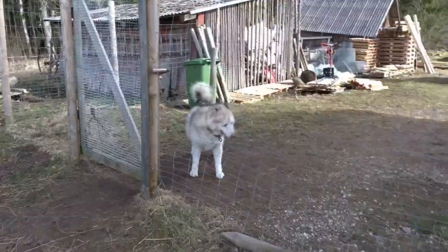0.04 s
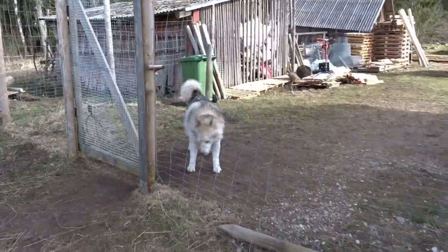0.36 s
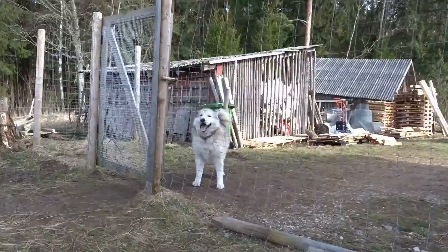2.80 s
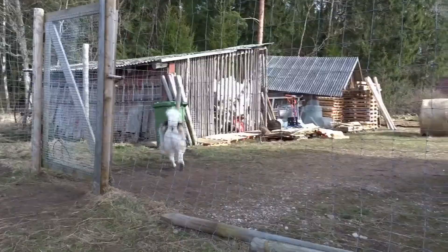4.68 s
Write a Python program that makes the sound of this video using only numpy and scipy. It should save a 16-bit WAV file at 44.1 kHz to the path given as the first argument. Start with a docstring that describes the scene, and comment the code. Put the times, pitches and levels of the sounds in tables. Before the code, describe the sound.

A large dog calls close to the microphone in an outdoor yard with a faint echo. From about 0.2 to 1.2 seconds it gives a soft, thin whine that climbs in pitch, with a faint high whistle on top. At 1.5 seconds comes one howl, the loudest sound, which rises, holds and slowly sinks, breaking into a hoarse rasp near 2.9 seconds. Three more high whines follow, at about 2.9 to 3.5, 3.8 to 4.5 and 4.7 to 5.4 seconds; the second rises and the last wavers. Each drops away into a small breathy puff, and the voice cracks briefly near 3.6 and 3.9 seconds. Far off, another dog whimpers faintly in the first second. Small distant birds pipe now and then, clearest around 3.5 seconds, with quick chirps after 5 seconds. Underneath are quiet open air, a slight early rustle and light wind rumbling on the microphone.

```python
"""A thin whine comes first, from a large dog close to the microphone in a kennel yard; then one loud
howl and three more whines. Each call rises, holds and drops away, its vocal folds sounding through
throat, mouth or nose. A high whistle rides on the whines, and the voice breaks hoarse three times.
Far off are small birds, another dog and a blurred echo of the first whine. The sheds ring faintly,
and a little wind rumbles at the two closely spaced microphone ports."""
import sys
import numpy as np
from scipy import signal
from scipy.fft import rfft, irfft
from scipy.io import wavfile
from scipy.ndimage import uniform_filter1d

SR = 44100
rng = np.random.default_rng(int(sys.argv[2]) if len(sys.argv) > 2 else 0)


def to_wav(sig):
    """Store sig (one row per channel, or 1-D mono) as 16-bit WAV at the path in sys.argv[1].

    Samples outside -1..1 are clipped; the rate is SR.
    """
    pcm = np.clip(np.atleast_2d(sig), -1, 1) * 32767
    pcm = np.round(pcm).astype(np.int16)
    wavfile.write(sys.argv[1], SR, pcm.T)  # frames by channels


N = 244241
T = np.arange(N) / SR

# The near dog's whines, up to where it lets go.
# Each row: time in seconds, pitch in Hz, level ahead of the nose in dB, rasp in dB.
FIRST_WHINE = [(0.207, 599, -46.5, -51), (0.265, 644, -50, -49.5), (0.33, 736, -41.5, -52),
               (0.6, 822.6, -42, -44), (0.76, 802.6, -38, -49.5), (0.84, 826, -43, -38),
               (0.885, 906, -40.5, -37.5), (1.0, 938, -39.5, -42), (1.085, 906.6, -36, -40),
               (1.168, 773, -37, -39)]
HIGH_WHINE = [(2.93, 1074, -35, -38.5), (3.12, 1085, -39.5, -33.5), (3.18, 1152, -26, -38),
              (3.274, 1209, -25.5, -47), (3.44, 1167, -26.5, -41), (3.468, 1086, -43.5, -43.5),
              (3.49, 1066, -31, -44)]
RISING_WHINE = [(3.795, 645, -38.5, -56), (3.85, 611.7, -27, -60), (3.89, 686, -33, -35),
                (3.96, 826, -35, -37), (4.014, 994, -36, -38.5), (4.05, 943.5, -32, -48),
                (4.1, 1053, -30.5, -57), (4.29, 1073, -28, -44), (4.422, 1052, -27, -40.5)]
WAVERING_WHINE = [(4.728, 815, -39.5, -36.5), (4.82, 848, -37.5, -42.5), (4.855, 930, -36, -39),
                  (4.95, 910, -31.5, -44.5), (5.035, 1018, -29.5, -41.5), (5.114, 924, -28, -45),
                  (5.17, 879, -35.5, -44), (5.224, 917, -27, -46), (5.252, 874, -32, -46),
                  (5.35, 813, -27, -42)]
# Each row: curve, final drop in seconds, level after it in dB, then octave, overtones and hiss in dB
# against the level, jitter as a share of pitch, flutter in dB, fall per overtone in dB, lean left in dB.
WHINES = [(FIRST_WHINE, .036, -32, 5, -38, -23.5, 0.0054, .4, 2.6, 3.4),
          (HIGH_WHINE, 0.042, -42, 0, -29, -55, .0027, 0.7, 3.8, 2.5),
          (RISING_WHINE, .042, -38, -3.04, -25, -32.5, 0.0017, 0.29, 1.8, 2.9),
          (WAVERING_WHINE, 0.033, -26, -1.1, -35, -30, 0.0061, 1.67, 3.2, 3.5)]
# The howl. Each row: time in seconds, pitch in Hz, then fundamental, octave and higher overtones in dB.
HOWL = [(1.555, 393.3, -43, -27.5, -36), (1.595, 506, -29.5, -21.5, -35), (1.635, 549.7, -16.5, -17, -22.5),
        (1.67, 596.3, -10, -21, -35), (1.71, 646, -8.5, -51.5, -62.5), (1.745, 651, -7.5, -33.5, -50.5),
        (1.8, 717, -10, -22.5, -44.5), (1.88, 757.2, -9.5, -28, -40.5), (1.99, 748.5, -9.5, -21.5, -35.5),
        (2.12, 685.3, -10, -20.5, -41.5), (2.26, 673.6, -16.5, -12.5, -39), (2.521, 649.4, -13.5, -23, -30),
        (2.641, 633.5, -7.5, -39.5, -36), (2.781, 633.7, -10.5, -32, -37),
        (2.86, 589.3, -25.5, -16.5, -29.5), (2.889, 541, -37, -15.5, -31)]
# The nose, deeply notched near 1 kHz, and the throat. Each row: frequency in Hz, gain in dB.
NOSE = [(520, -3), (630, 7), (740, -2.5), (850, 0), (920, 2.5), (965, -1.5), (1015, -15.5), (1062, -0.5),
        (1200, -0.5), (1400, -2.5), (1620, -6.5), (1850, -2.5), (2000, 1), (2140, -7), (2300, -23)]
THROAT = [(1100, 13.5), (1650, 17), (2200, -9.5), (2700, -1.5), (3200, -6), (3900, -2), (4600, -8.5),
          (5400, -27), (6600, -2), (7400, -23), (8900, -6.5), (10500, -18), (11400, -33), (12500, -54)]
# Jaw and lips move in the howl. Each row: time in seconds, lower and upper mouth resonance in Hz.
HOWL_MOUTH = [(1.65, 1677, 2840), (1.76, 1950, 4100), (1.9, 2300, 3670), (2.02, 2822, 4470),
              (2.11, 1920, 4046), (2.25, 1907, 3510), (2.41, 2603, 3260), (2.63, 2600, 3700),
              (2.75, 2020, 3780), (2.84, 2890, 4330)]
# The lower, then the upper resonance. Each row: width in Hz, strength in dB.
MOUTH_SHAPES = [(260, 15.5), (380, 5.5)]
# One whistle a whine. Each row: start and end in seconds, first and last pitch in Hz, level in dB.
WHISTLES = [(.35, 1.22, 3840, 3647, -59), (3.105, 3.539, 3810, 3587, -55), (3.959, 4.481, 3718, 3604, -52),
            (4.719, 5.379, 3670, 3533, -55.5)]
# The whistle's tones. Each row: multiple of the whistle's pitch, multiple of the folds' pitch.
SIDEBAND_ORDERS = [(1, -2), (1, -1), (1, 0), (1, 1), (2, -1), (2, 0), (2, 1), (2, 2), (2, 3), (3, 0),
                   (3, 1)]
# The gain of each of those tones in dB.
SIDEBAND_DB = [1.5, -12, -5, -6.5, -22, -10, -10, -11.5, -30, -14.5, -26]
# Hoarse breaks. Each row: start, peak and end in seconds, level in dB.
BREAKS = [(2.878, 2.985, 3.17, -25.5), (3.531, 3.59, 3.63, -38), (3.851, 3.891, 3.96, -37)]
# Noise of the throat, the teeth and rattling folds. Each row: frequency in Hz, spectral density in dB.
RASP = [(100, -40), (280, -5), (550, -4.5), (850, -1), (1400, -3), (1900, -1.5), (2400, -16.5), (3200, -25),
        (4600, -22.5), (6500, -49.5), (13000, -65.5)]
HISS = [(1500, -25), (2800, 3.5), (3900, -12), (4700, 4), (5600, -12), (7400, -4.5), (8600, -7), (11200, 3),
        (12100, -1.5), (13200, -21.5)]
HOARSE = [(250, -34), (550, -18.5), (800, 8), (1150, 3.5), (1500, -9.5), (1950, 1.5), (2350, -11.5),
          (2900, 2), (3600, -18), (4700, -12.5), (6500, -23), (8000, -20.5), (10500, -23.5), (12400, -49),
          (13800, -72)]
# Far tones: another dog's whimpers, and at 1.14 s the blurred echo of the near dog's first whine.
# Each row: start and length in seconds, first and last pitch in Hz, level in dB,
# octave against the fundamental in dB, buzz as a share of pitch.
FAR_TONES = [(0.0, 0.087, 766, 734, -50, -18, 0.034), (0.394, 0.53, 1390, 1254, -45, -33, 0.037),
             (.6, .2, 1060, 929, -40, -8, .016), (1.14, .36, 869, 813, -44.5, -9, 0.056),
             (3.587, .03, 1040, 863, -38, -20.5, .05)]
# Single notes from the trees. Each row: start and length in seconds, first and last pitch in Hz,
# level in dB, buzz as a share of pitch.
BIRDS = [(-.04, 0.49, 5740, 4380, -63, .004), (.558, .17, 4213, 4090, -57, 0.0086),
         (.623, 0.28, 5150, 4600, -60, .006), (1.3, .25, 4580, 4450, -65, 0.0039),
         (3.28, 0.155, 6840, 6620, -49.5, .026), (3.495, 0.0615, 3750, 3930, -35.5, 0.0056),
         (3.535, 0.062, 3945, 3840, -42, .006), (3.497, .24, 3094, 2900, -54, 0.012),
         (4.5, .12, 3350, 3500, -53.5, 0.037)]
# One bird pipes on a steady pitch. Each row: start in seconds, level in dB.
PIPES = [(0.024, -39), (3.098, -45), (3.665, -48)]
# The yard's echo. Each row: frequency in Hz, time to fall 60 dB in seconds.
YARD_DECAY = [(200, 0.92), (1000, 0.71), (4000, 0.31), (12000, 0.41)]
# Its colour. Each row: frequency in Hz, gain in dB.
ECHO_COLOUR = [(200, 4), (650, -9), (1100, -5), (2500, 1), (6000, 8), (12000, 2)]
# Open air, rustling and wind. Each row: frequency in Hz, spectral density in dB.
AIR = [(15, -48), (25, -25.5), (233, -2.5), (469, -8.5), (631, 1.5), (848, -13.5), (945, -4.5),
       (1620, -5.5), (2850, -16), (3630, -15.5), (5730, -23.5), (10900, -26), (12200, -25.5), (13500, -65),
       (15500, -65)]
RUSTLE = [(120, -24.5), (250, -7), (600, -7), (1100, -10), (2000, -10.5), (3400, -4.5), (4700, -18.5),
          (7000, -33)]
RUMBLE = [(12, -34.5), (28, -6), (48, 2.5), (75, -3.5), (130, -16.5), (400, -46.5)]
# The rustling dies down. Each row: time in seconds, level in dB.
RUSTLE_LEVEL = [(0, -44.5), (.2, -51.5), (.3, -46), (.45, -53.5), (.8, -58.5), (1.4, -60.5), (5.54, -69)]
# Gusts on the microphone. Each row: peak time and width in seconds, level in dB.
GUSTS = [(1.7, .07, -56.5), (2.42, 0.19, -58.5), (3.3, 0.13, -69), (3.66, 0.054, -51.5), (4.06, 0.17, -55),
         (4.72, 0.046, -62.5)]
# The two microphone ports. Each row: frequency in Hz, phase between them in radians.
PORT_PHASE = [(0, 0), (2150, 0.23), (15400, 0.13)]

# above its middle pitch a whine gets purer and hisses more
MIDDLE_HZ, OVERTONE_DB_PER_OCTAVE, HISS_DB_PER_OCTAVE = 904, -18, 13.5
WHINE_MOUTH_HZ = (2260, 3200)
# every whine ends alike: the pitch collapses, the tone dies, and a puff of rasp follows
COLLAPSE_HZ, LOWEST_HZ, COLLAPSE_POWER = 587, 476, 1.4
TONE_RELEASE_S, TONE_RELEASE_DB = .016, -15.5
PUFF_DB, PUFF_S, PUFF_FADE_DB = -34.5, .085, -12
HOWL_ATTACK_S, HOWL_RELEASE_S, HOWL_EDGE_DB, BRIGHT_DB = .04, .014, -24.5, -37
# below this pitch the howling folds go slack: more rasp, less hiss
TAUT_HZ, SLACK_RASP_DB_PER_OCTAVE, SLACK_HISS_DB_PER_OCTAVE = 680, 14, -17
WHISTLE_RISE_SHARE, WHISTLE_RELEASE_S, WHISTLE_EDGE_DB = .4, .057, -11.5
PIPE_HZ, PIPE_S, PIPE_ECHO_DB, PIPE_ECHO_S = 3953, .11, -12.5, .22
CHIRP_START_S, CHIRP_PERIOD_S, CHIRP_COUNT = 5.102, .0873, 5
CHIRP_S, CHIRP_FROM_HZ, CHIRP_TO_HZ, CHIRP_DB = .0277, 3640, 3140, -51.5
AIR_DB, BREEZE_DB = -54, -80


def near_dog():
    """The dog at the microphone, near centre: howl, whines with their whistles, and hoarse breaks."""
    out = np.zeros((2, N))
    add(out, *howl(), pan_db=-.3)
    for (curve, *manner, pan_db), row in zip(WHINES, WHISTLES):
        add(out, *whine(curve, *manner), pan_db)
        add(out, *whistle(curve, *row), pan_db=4.5)
    for row in BREAKS:
        add(out, *hoarse_break(*row), pan_db=-.7)
    return out


def howl():
    """The full voice through a moving mouth, raspy where it is low and hissing where it is bright."""
    start, end = HOWL[0][0], HOWL[-1][0]
    t = np.arange(start - HOWL_ATTACK_S, end + HOWL_RELEASE_S, 1 / SR)
    hz, first_db, octave_db, overtone_db = follow(HOWL, t)
    edge_db = np.interp(t, [t[0], start, end, t[-1]], [HOWL_EDGE_DB, 0, 0, HOWL_EDGE_DB])
    slack = np.maximum(np.log2(TAUT_HZ / hz), 0)
    brightness_db = overtone_db - BRIGHT_DB
    rasp_db = -40 + .33 * brightness_db + edge_db / 2 + SLACK_RASP_DB_PER_OCTAVE * slack
    hiss_db = -54 + .7 * brightness_db + edge_db / 2 + SLACK_HISS_DB_PER_OCTAVE * slack
    return voice(t, hz, first_db + edge_db, octave_db + edge_db, overtone_db + edge_db, rasp_db, hiss_db,
                 follow(HOWL_MOUTH, t), jitter=.0018, flutter_db=.12, fall_db=.19, hiss_shift=.88)


def whine(curve, drop_s, end_db, octave_db, overtone_db, hiss_db, jitter, flutter_db, fall_db):
    """A thin tone slides across the resonances of the nose, then collapses into a puff."""
    let_go, last_hz = curve[-1][:2]
    end = let_go + drop_s
    puff = [(end, last_hz, end_db, PUFF_DB), (end + PUFF_S, last_hz, end_db, PUFF_DB + PUFF_FADE_DB)]
    t, hz, db, rasp_db = curves(list(curve) + puff)
    fallen = (np.maximum(t - let_go, 0) / drop_s) ** COLLAPSE_POWER
    hz = np.maximum(hz - (last_hz - COLLAPSE_HZ) * fallen, LOWEST_HZ)
    db = db + TONE_RELEASE_DB * np.maximum(t - end, 0) / TONE_RELEASE_S
    height = np.log2(hz / MIDDLE_HZ)
    first_db = db + read(NOSE, hz)
    octave_db = db + octave_db + read(NOSE, 2 * hz)
    overtone_db = db + overtone_db + OVERTONE_DB_PER_OCTAVE * height
    hiss_db = db + hiss_db + HISS_DB_PER_OCTAVE * height
    return voice(t, hz, first_db, octave_db, overtone_db, rasp_db, hiss_db,
                 WHINE_MOUTH_HZ, jitter, flutter_db, fall_db)


def voice(t, hz, first_db, octave_db, overtone_db, rasp_db, hiss_db,
          centres, jitter, flutter_db, fall_db, hiss_shift=1):
    """Nearly pure fold vibration with throat overtones, plus turbulence that puffs once a cycle."""
    size = len(t)
    # the closer the rasp comes to the tone, the less steadily the folds vibrate
    unrest = np.minimum(amp(rasp_db - np.maximum(first_db, octave_db)), 1)
    phase = phase_of(hz * (1 + (jitter + .013 * unrest) * wander(130, size)))
    tone = amp(first_db) * np.sin(phase) + amp(octave_db) * np.sin(2 * phase)
    # as the pitch collapses, strong and weak cycles alternate: a creak an octave down
    collapse = np.clip(-np.gradient(np.log(hz)) * SR / 7, 0, 1) ** 2
    tone += uniform_filter1d(collapse, size=900) * amp(first_db - 16) * np.sin(phase / 2)
    orders = np.arange(3, 21)[:, None]
    tract = vocal_tract(centres, orders * hz) * amp(-fall_db * orders)
    tract /= np.linalg.norm(tract, axis=0)
    shimmer = amp(3.5 * np.array([wander(12, size) for _ in orders]))
    tone += amp(overtone_db - 2.5) * (tract * shimmer * np.sin(orders * phase)).sum(0)
    tone *= np.sqrt(2) * amp((flutter_db + 2.7 * unrest) * wander(25, size))
    puffs = unit(1 + .28 * np.cos(phase))
    rasp = amp(rasp_db - 4) * patchy(noise(RASP, size), depth_db=5)
    hiss = amp(hiss_db - 1) * patchy(noise(np.array(HISS) * [hiss_shift, 1], size), depth_db=4.5)
    return t[0], tone * fade(size, seconds=.0049) + puffs * (rasp + hiss) * fade(size, seconds=.019)


def vocal_tract(centres, hz):
    """Gain of the throat at frequencies hz, lifted by the two mouth resonances at centres."""
    peaks = sum(amp(db) / (1 + (2 * (hz - centre) / width_hz) ** 2)
                for centre, (width_hz, db) in zip(centres, MOUTH_SHAPES))
    return amp(read(THROAT, hz)) * (1 + peaks)


def whistle(curve, start, end, first_hz, last_hz, db):
    """A high whistle swells and sags; the folds chop it into sum and difference tones."""
    peak = start + WHISTLE_RISE_SHARE * (end - start)
    t, swell_db = curves([(start, WHISTLE_EDGE_DB), (peak, 0),
                          (end - WHISTLE_RELEASE_S, 0), (end, WHISTLE_EDGE_DB)])
    size = len(t)
    carrier = phase_of(np.linspace(first_hz, last_hz, size) * (1 + .003 * wander(140, size)))
    folds = phase_of(follow(curve, t)[0])
    tones = sum(amp(tone_db + 2 * wander(23, size)) * np.sin(m * carrier + k * folds)
                for (m, k), tone_db in zip(SIDEBAND_ORDERS, SIDEBAND_DB))
    return start, np.sqrt(2) * amp(db + swell_db) * tones * fade(size)


def hoarse_break(start, peak, end, db):
    """The folds lose their pitch and rattle irregularly, with a hiss at the teeth."""
    t, level_db = curves([(start, db - 12.5), (peak, db), (end, db - 21)])
    rattle = patchy(noise(HOARSE, len(t)), depth_db=2.5)
    hiss = amp(-32) * noise(HISS, len(t))
    return start, amp(level_db + 1.63 * wander(81, len(t))) * (rattle + hiss) * fade(len(t))


def far_sounds():
    """Far off and a little left: birds, another dog's whimpers and the first whine's blurred echo."""
    out = np.zeros((2, N))
    for start, length, first_hz, last_hz, db, buzz in bird_notes():
        phase, swell = glide(length, first_hz, last_hz, buzz)
        add(out, start, amp(db) * swell * np.sin(phase), pan_db=3)
    for start, length, first_hz, last_hz, db, octave_db, buzz in FAR_TONES:
        phase, swell = glide(length, first_hz, last_hz, buzz)
        tone = np.sin(phase) + amp(octave_db) * np.sin(2 * phase)
        add(out, start, amp(db) * swell * tone, pan_db=1.5)
    return out


def bird_notes():
    """Rows for the single notes, the piping with its answer from the wood, and the falling chirps."""
    pipes = [(s, PIPE_S, PIPE_HZ, PIPE_HZ, db, .002) for s, db in PIPES]
    echoes = [(s + PIPE_S / 2, PIPE_ECHO_S, PIPE_HZ, PIPE_HZ, db + PIPE_ECHO_DB, .004) for s, db in PIPES]
    chirps = [(CHIRP_START_S + k * CHIRP_PERIOD_S, CHIRP_S, CHIRP_FROM_HZ, CHIRP_TO_HZ, CHIRP_DB, .011)
              for k in range(CHIRP_COUNT)]
    return list(BIRDS) + pipes + echoes + chirps


def glide(length, first_hz, last_hz, buzz):
    """Phase and flickering envelope of one gliding note."""
    size = round(length * SR)
    hz = np.linspace(first_hz, last_hz, size) * (1 + buzz * wander(230, size))
    return phase_of(hz), np.sqrt(2) * signal.windows.tukey(size, .5) * amp(3.4 * wander(33, size))


def yard_echo(x):
    """Thin scattered echo from sheds and trees, each band dying at its own speed."""
    mid, side = rng.standard_normal((2, SR)) * (rng.random((2, SR)) < 1500 / SR)  # 1500 taps a second
    taps = (mid + .12 * np.array([side, -side])) * (T[:SR] > .012)
    hz, t, bands = signal.stft(taps, SR, nperseg=256)
    gain_db = read(ECHO_COLOUR, hz)[:, None] - 60 * t / read(YARD_DECAY, hz)[:, None]
    tail = signal.istft(bands * amp(gain_db), SR, nperseg=256)[1]
    return signal.fftconvolve(x, tail / np.linalg.norm(tail[0]), axes=1)[:, :N]


def background():
    """Open air, rustling in the yard and wind on the microphone, almost alike in both channels."""
    breeze = amp(BREEZE_DB + 3 * wander(4, N))
    wind = breeze + sum(amp(db) * np.exp(-((T - s) / width) ** 2) for s, width, db in GUSTS)
    rustle_db = follow(RUSTLE_LEVEL, T)[0]

    def layer():
        air = amp(AIR_DB + .65 * wander(5, N)) * patchy(noise(AIR, N), depth_db=-1)
        rustle = amp(rustle_db + 1.5 * wander(27, N)) * patchy(noise(RUSTLE, N), depth_db=2)
        return air + rustle + wind * noise(RUMBLE, N)
    side = amp(-17) * layer()
    return layer() * amp([[.4], [-.4]]) + np.array([side, -side])


def amp(db):
    """Decibels to gain."""
    return 10 ** (np.asarray(db) / 20)


def unit(x):
    """Scales to rms 1."""
    return x / np.sqrt(np.mean(x ** 2) + 1e-20)


def phase_of(hz):
    """Running phase of a moving pitch, in radians."""
    return 2 * np.pi * np.cumsum(hz) / SR


def read(points, hz):
    """Reads a spectrum table on a log-frequency axis."""
    f, value = np.transpose(points)
    return np.interp(np.log(hz + 1), np.log(f + 1), value)


def follow(rows, t):
    """Each column of a timed table at the times t."""
    s, *columns = np.transpose(rows)
    return [np.interp(t, s, column) for column in columns]


def curves(rows):
    """Sample times of a table, then each column at those times."""
    t = np.arange(rows[0][0], rows[-1][0], 1 / SR)
    return [t] + follow(rows, t)


def noise(points, size):
    """Noise of rms 1 with the given spectrum."""
    gain = amp(read(points, np.fft.rfftfreq(size, 1 / SR)))
    return unit(irfft(rfft(rng.standard_normal(size)) * gain, size))


def patchy(x, depth_db):
    """Turbulence swells and fades in small patches of time and frequency."""
    bands = signal.stft(x, nperseg=512, noverlap=384)[2]
    patches = uniform_filter1d(rng.standard_normal(bands.shape), size=4, axis=0)
    patches = unit(uniform_filter1d(patches, size=14, axis=1))
    return unit(signal.istft(bands * amp(depth_db * patches), nperseg=512, noverlap=384)[1][:len(x)])


def wander(hz, size):
    """Random drift of rms near 1, up to about hz."""
    f = np.fft.rfftfreq(size + SR, 1 / SR)
    return unit(irfft(rfft(rng.standard_normal(size + SR)) / (1 + (f / hz) ** 2), size + SR))[:size]


def fade(size, seconds=.0027):
    """Flat window with soft ends."""
    return signal.windows.tukey(size, min(1, 2 * seconds * SR / size))


def add(mix, s, sound, pan_db):
    """Mixes a sound in at time s, leaning left by pan_db."""
    start = round(s * SR)
    sound = sound[max(-start, 0):]
    part = mix[:, max(start, 0):][:, :len(sound)]
    part += amp([[pan_db / 2], [-pan_db / 2]]) * sound[:part.shape[1]]


def scene():
    """From the microphone's spot the near dog is almost dry; the far sounds carry more echo."""
    near, far = near_dog(), far_sounds()
    return near + far + yard_echo(amp(-13) * near + amp(-7.5) * far) + background()


def record(dry):
    """Two closely spaced microphone ports, slightly apart in phase, then the band limit."""
    half_shift = np.exp(.5j * read(PORT_PHASE, np.fft.rfftfreq(N, 1 / SR)))
    pair = irfft(rfft(dry) * np.array([half_shift, half_shift.conj()]), N)
    lowpass = signal.firwin(511, cutoff=15750, window=("kaiser", 9), fs=SR)
    return signal.oaconvolve(pair, lowpass[None], "same")


dry = scene()
out = record(dry)
to_wav(out)
```